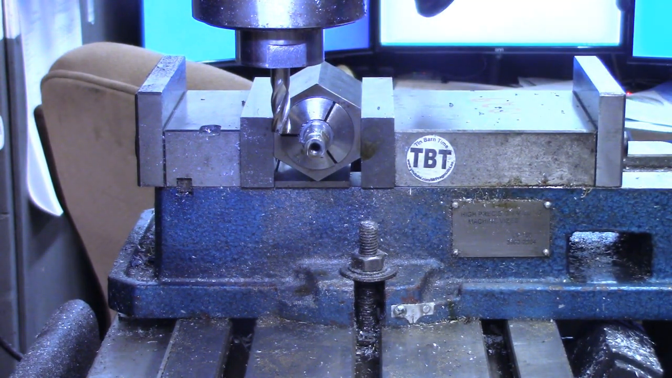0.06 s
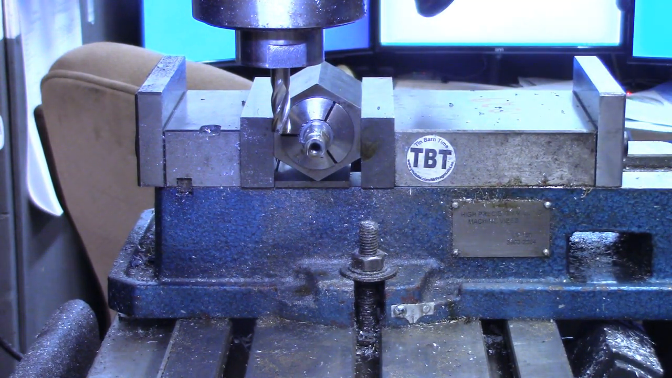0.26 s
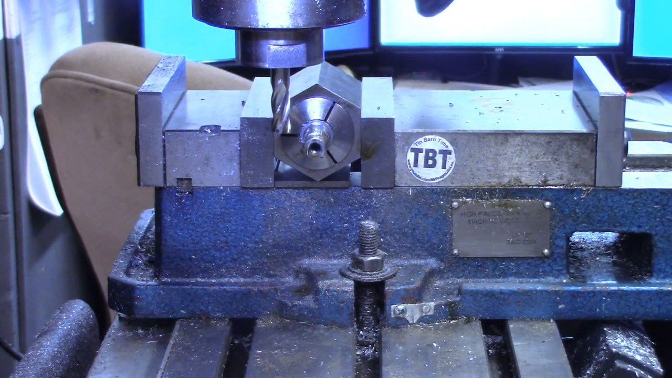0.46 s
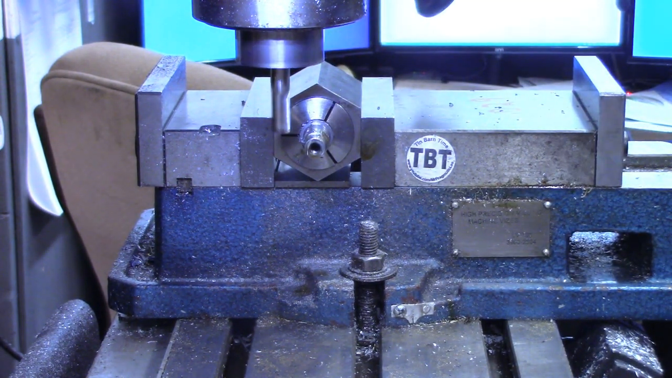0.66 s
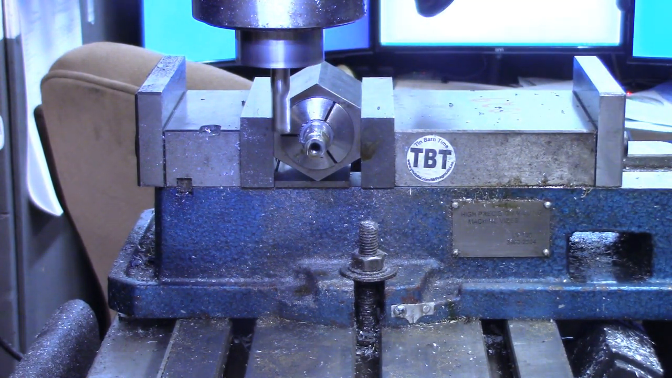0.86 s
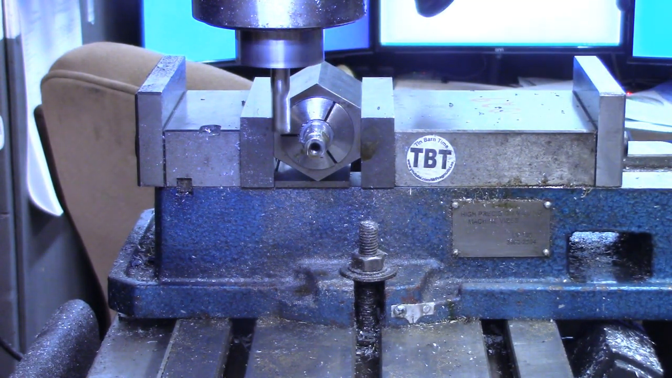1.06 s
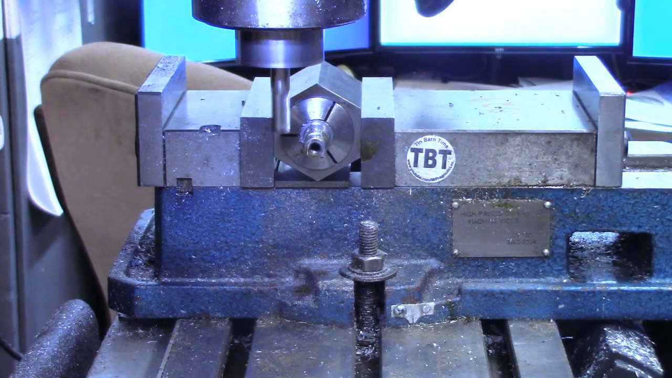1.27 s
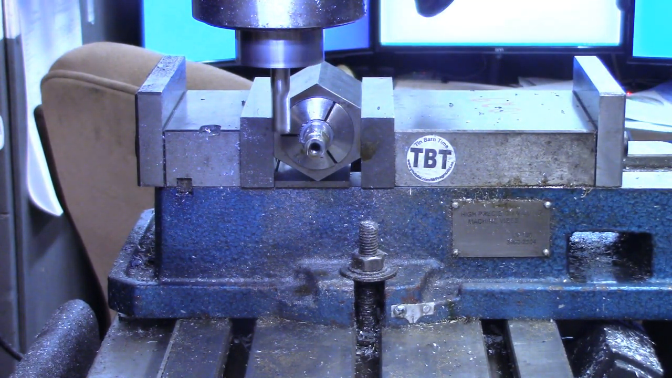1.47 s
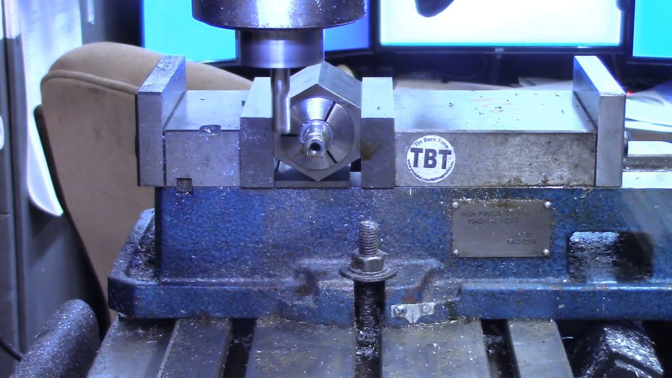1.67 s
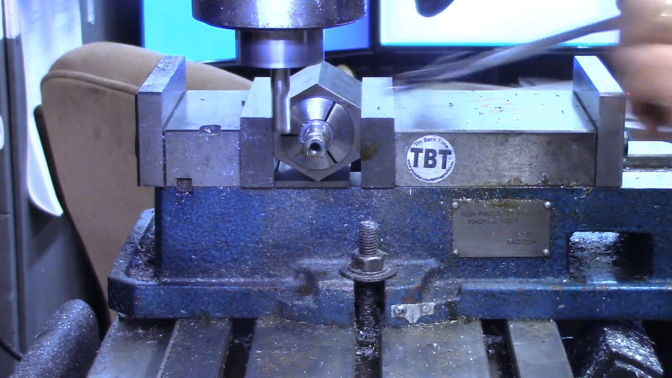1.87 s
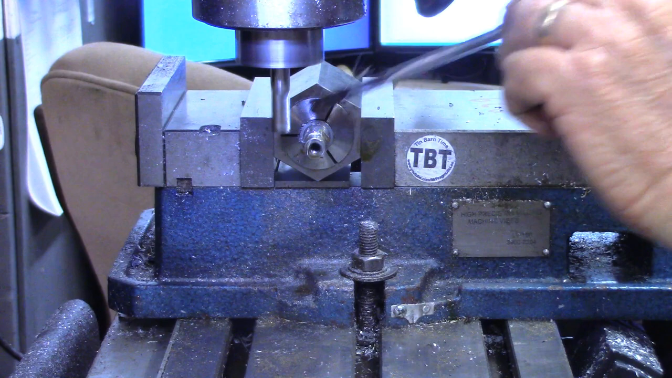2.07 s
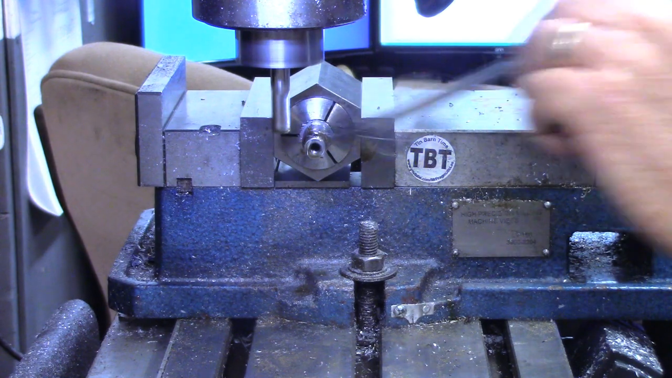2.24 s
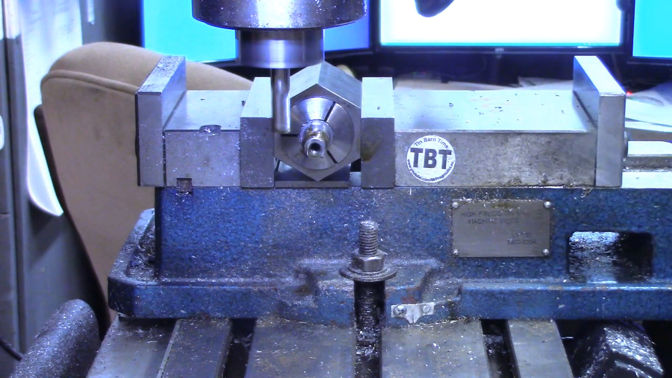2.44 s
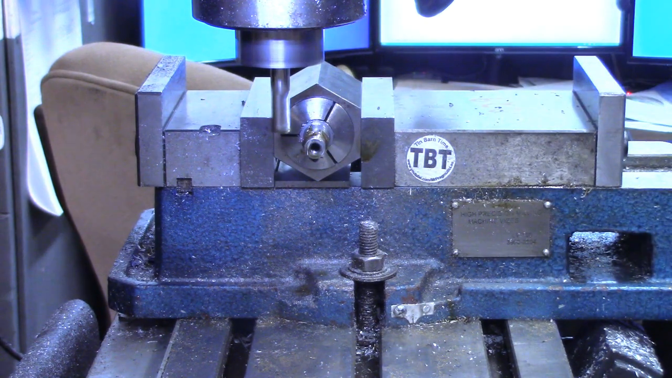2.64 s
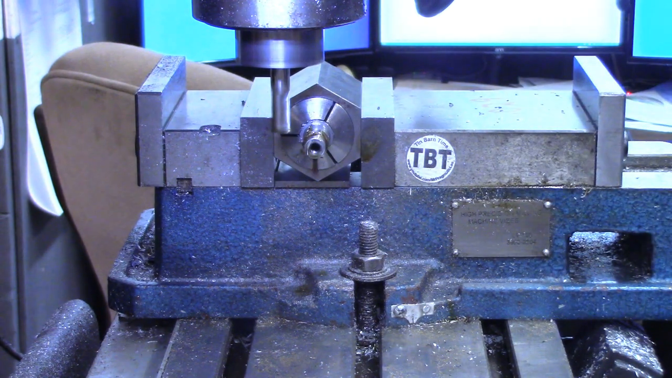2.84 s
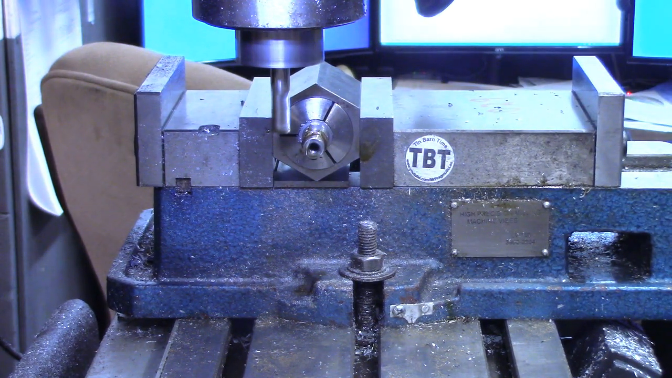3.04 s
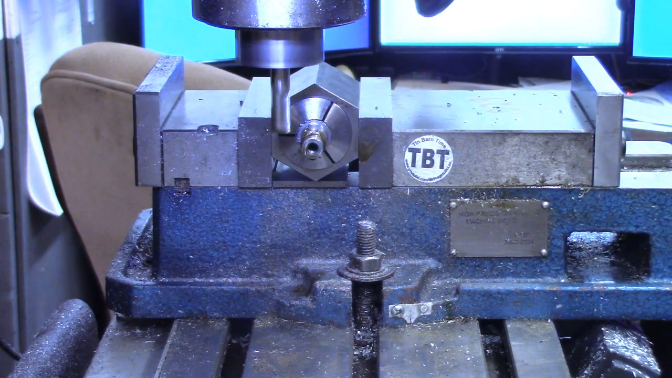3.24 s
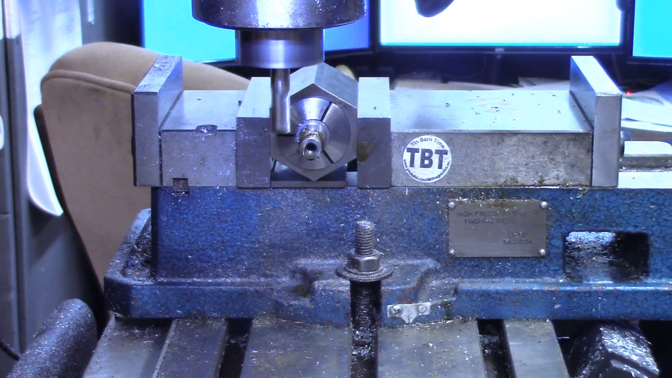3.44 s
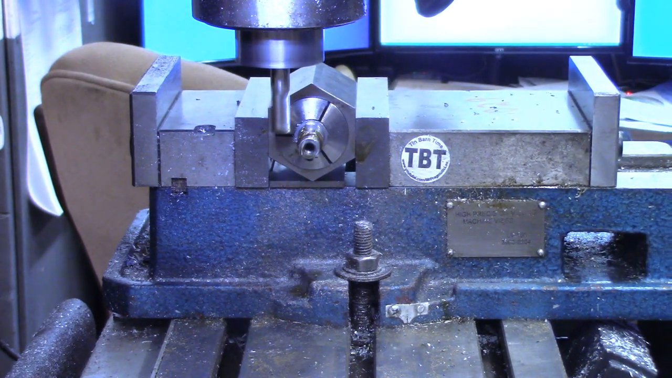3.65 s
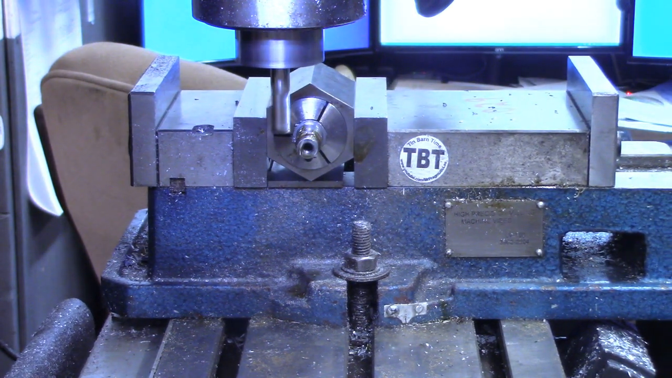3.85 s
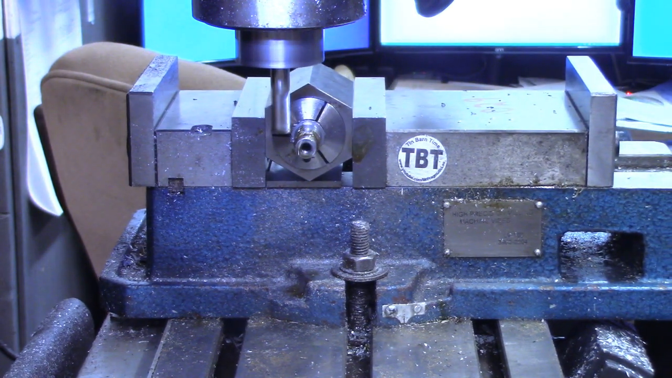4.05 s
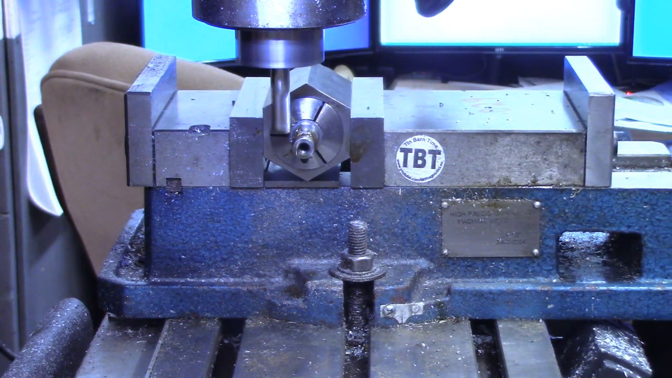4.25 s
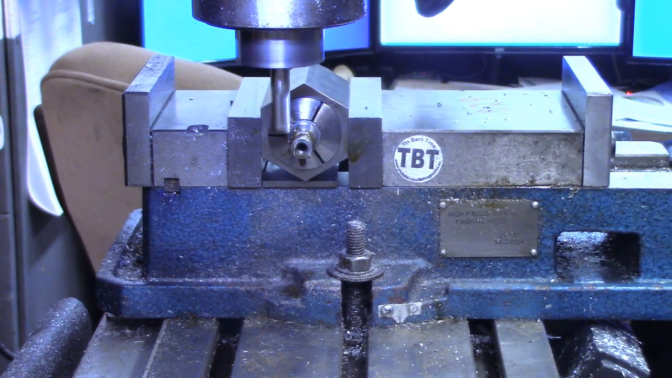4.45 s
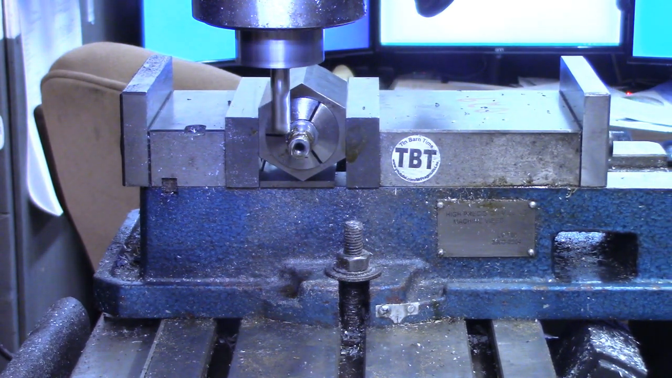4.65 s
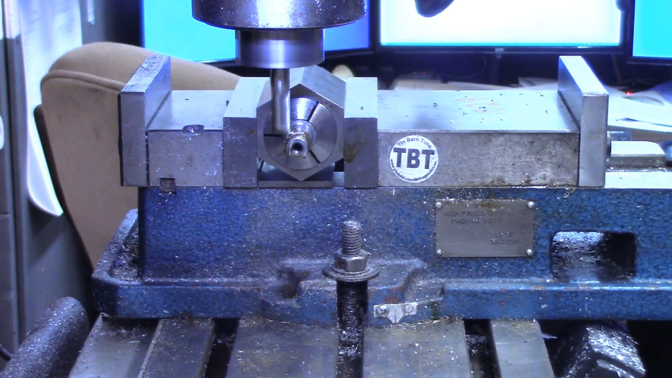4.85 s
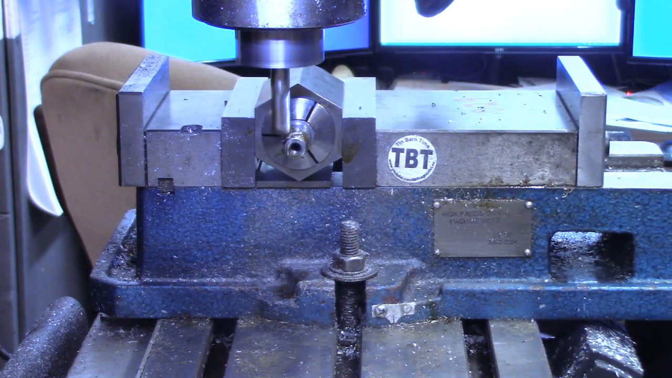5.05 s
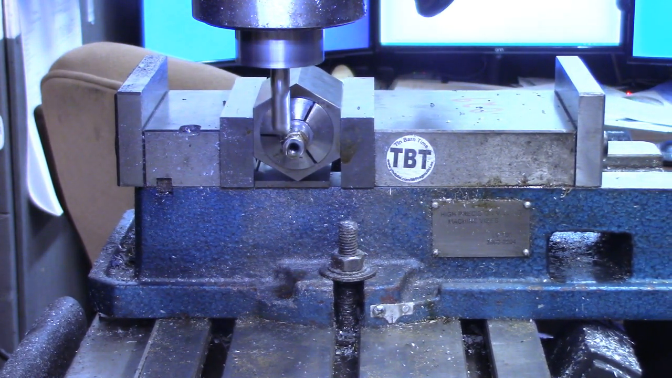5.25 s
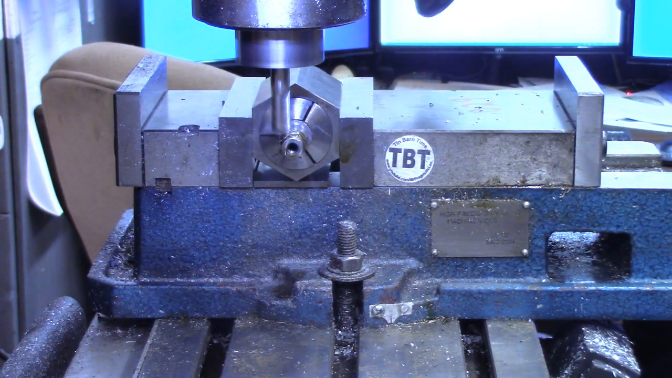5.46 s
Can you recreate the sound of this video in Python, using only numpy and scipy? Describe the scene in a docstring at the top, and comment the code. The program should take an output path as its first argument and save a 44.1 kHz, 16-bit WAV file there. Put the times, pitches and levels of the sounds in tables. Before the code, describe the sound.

Close up in a small workshop: near-silent room air with soft low rumbles, a faint switch tick, then a sharp gear clunk and short grind as a milling machine starts. It runs with a harsh, rapid metallic rattle, a hum and a wavering whine. Near the end the cutter touches steel, the rattle eases and a scraping, singing cut takes over.

```python
"""A geared milling machine starts up and then cuts steel in a small workshop, heard close up.
Soft low rumbles and a faint hiss (shaped noise) come first, then the tick of the switch (filtered clicks).
At switch-on the motor hums (wavering sines); the gears clunk into mesh and grind up to speed (random impacts).
They then rattle and whine, and the slack drive clatters on every spindle turn (impacts gated by the rotation).
Near the end the cutter meets the steel: the load quiets the gears, and the flutes scrape and sing."""
import sys
import numpy as np
from scipy import signal
from scipy.fft import rfft, irfft
from scipy.io import wavfile
from scipy.ndimage import uniform_filter1d

SR = 44100
rng = np.random.default_rng(int(sys.argv[2]) if len(sys.argv) > 2 else 0)


def transcribe(u):
    """Save the signal u as a 16-bit wav file named by the first command-line argument.

    u: samples, shape (n,) or (channels, n), limited to [-1, 1]; the rate is SR.
    q: integer samples, one column per channel.
    """
    v = np.clip(np.atleast_2d(u).T, -1, 1)
    q = np.round(v * 32767).astype(np.int16)
    wavfile.write(sys.argv[1], SR, q)


N = 242991
T = np.arange(N) / SR  # s
START, MESH_IN, UP_TO_SPEED = .626, .63, .745  # s: power on, gears engage, spindle at speed
CUT_START, FEED_IN_S = 5.1, .29  # s: the flutes first touch the steel; time from there to full load
SPINDLE_HZ, TURN_MARK = 19.825, .7495  # turns per second; s at which a turn begins
TURNS = (T - TURN_MARK) * SPINDLE_HZ
RIPPLE_HZ = 120  # motor torque ripple
FLURRY_HZ = 139.9  # flurries of tooth impacts, about seven a spindle turn


def gain_of(db):
    """Definition of the decibel: level to amplitude ratio."""
    return 10 ** (np.asarray(db) / 20)


def evened(x):
    """Normalisation of power: scales to an rms of one."""
    return x / np.sqrt(np.mean(x ** 2) + 1e-20)


def level(curve):
    """Envelope interpolated in decibels from rows (time [s], level [dB]); silent before the first row."""
    s, db = np.transpose(curve)
    return gain_of(np.interp(T, s, db)) * (T >= s[0])


def drift(hz):
    """Low-pass random fluctuation of rms one, falling away above about hz."""
    f = np.fft.rfftfreq(N, 1 / SR)
    spectrum = rfft(rng.standard_normal(N))
    return evened(irfft(spectrum / (1 + (f / hz) ** 4), N))


def lobe(turns, centre, width):
    """Periodic modulation: a smooth bump once a turn; centre and width in turns."""
    from_centre = (turns - centre + .5) % 1 - .5
    return np.exp(-.5 * (from_centre / width) ** 2)


def pulsing(hz, depth_db, width=0.18):
    """Amplitude modulation: a gain that peaks hz times a second, or dips if depth_db is negative."""
    return gain_of(depth_db * (2 * lobe(T * hz, 0.53, width) - 1))


def load():
    """Cutting load as a share of the full load: none until the flutes touch, then rising with the feed."""
    return np.clip((T - CUT_START) / FEED_IN_S, 0, 1)


def running(start, rise_s, db, loaded_db):
    """Onset and steady state: a gain that comes up at start, holds, and changes by loaded_db at full load."""
    return np.clip((T - start) / rise_s, 0, 1) * gain_of(db + loaded_db * load())


def swell(s, width_s, db):
    """Gaussian envelope: rises smoothly to db at s and falls again."""
    return gain_of(db) * np.exp(-.5 * ((T - s) / width_s) ** 2)


def burst(start, hold_s, db):
    """Exponential decay: a quick attack, a hold, then a release falling 60 dB in the decay time."""
    attack_s, t60_s = .011, .12
    release_db = -60 * np.maximum(T - start - hold_s, 0) / t60_s
    return np.clip((T - start) / attack_s, 0, 1) * gain_of(db + release_db)


def colour(x, shape, peaks=()):
    """Minimum-phase filtering by a broad spectrum and its resonances (or dips, where lift is negative)."""
    size = 8192
    hz = np.fft.rfftfreq(size, 1 / SR)
    f, db = np.transpose(shape)
    db = np.interp(np.log(hz + 1), np.log(f), db)
    for centre, width, lift in peaks:
        db = db + lift / (1 + (2 * (hz - centre) / width) ** 2)
    log_gain = np.log(gain_of(np.r_[db, db[-2:0:-1]]))
    # the Hilbert transform of the log gain is the phase that makes the ringing causal
    response = np.exp(np.conj(signal.hilbert(log_gain)))
    ring = np.fft.ifft(response).real[:size // 2]
    return signal.oaconvolve(x, ring)[:N]


def scatter(x, t60, wet_db):
    """Diffuse reverberation: the direct sound plus dense reflections decaying 60 dB in t60 seconds."""
    t = T[:SR // 2]
    tail = rng.standard_normal(len(t)) * gain_of(-60 * t / t60)
    return x + gain_of(wet_db) * signal.oaconvolve(x, tail / np.linalg.norm(tail))[:N]


def strikes(force, per_s, spread_db, t60, wet_db, count=8):
    """Random impact process: uneven blows share out the power of the force among count ringing spots."""
    size = gain_of(spread_db * np.clip(rng.standard_normal(N), -2, 2)) * rng.choice([-1, 1], N)
    hits = size * (rng.random(N) < per_s / SR)
    spot = rng.integers(0, count, N)
    # dividing by the local power lets the force alone set the strength
    local_power = abs(uniform_filter1d(hits ** 2, size=400))
    hits = force * hits / np.sqrt(local_power + 1e-4)
    return evened(sum(scatter(hits * (spot == k), t60, wet_db) for k in range(count)))


def tone(hz, waver_hz, flutter_db):
    """Frequency and amplitude modulation: a sine of rms one that wavers in pitch and strength."""
    phase = 2 * np.pi * np.cumsum(hz + waver_hz * drift(12.06)) / SR
    start_phase = 2 * np.pi * rng.random()
    return evened(np.sin(phase + start_phase) * gain_of(flutter_db * drift(37)))


def blows(rows, shape, t60, wet_db):
    """Impulse response: single knocks, each row's level being the rms over about ten milliseconds."""
    clicks = np.zeros(N)
    for s, db in rows:
        clicks[round(s * SR)] = gain_of(db)
    sound = colour(scatter(clicks, t60, wet_db), shape)
    return sound * np.linalg.norm(clicks) * np.sqrt(SR / 100) / np.linalg.norm(sound)


# spectrum of the room air: (frequency [Hz], relative level [dB])
AIR_COLOUR = [(30, -23.5), (100, -19), (180, -20), (780, -19.5), (1770, -27.5), (3000, -34.5),
              (5500, -40.5), (12400, -48), (14100, -50), (15500, -66)]
# soft low rumbles: (time of the top [s], width [s], level [dB])
RUMBLES = [(.245, 0.079, -47), (.37, 0.014, -55), (1.2, 0.048, -57.5)]


def workshop():
    """Broadband background noise: quiet room air, a brief faint hiss and soft low rumbles over a floor."""
    air = gain_of(-63.5) * evened(colour(rng.standard_normal(N), AIR_COLOUR))
    # noise spectra: (frequency [Hz], relative level [dB])
    hiss = colour(rng.standard_normal(N), [(200, 17.0), (2500, -5), (7000, -4.5), (13000, -12), (15500, -14)])
    low = colour(rng.standard_normal(N),
                 [(8, 3), (22, -5.5), (42, 3.5), (68, -4), (110, -33), (300, -84), (1000, -106)])
    rumble = gain_of(-71.5) + sum(swell(*row) for row in RUMBLES)
    return air + swell(0.029, width_s=0.026, db=-58.5) * evened(hiss) + rumble * evened(low)


# motor hum: (frequency [Hz], level relative to the other lines [dB])
HUM_LINES = [(120, -75.5), (150, -101), (180, -96), (199.7, -75.5), (230, -80.5), (299.6, -78), (320, -80)]


def motor_hum():
    """Line spectrum: low steady tones from the moment the power is on, stronger under load."""
    lines = sum(gain_of(db) * tone(hz, waver_hz=0.5, flutter_db=3.0) for hz, db in HUM_LINES)
    return running(START, rise_s=.06, db=1.0, loaded_db=4.0) * lines


# ticks of the switch: (time [s], level [dB])
TICKS = [(.469, -66), (.473, -56), (.489, -70)]
# spectrum of the switch: (frequency [Hz], relative level [dB])
SWITCH_COLOUR = [(200, -28), (900, -14), (1400, 6), (2000, 3), (2800, -13), (5000, -23), (12000, -38)]
# the gears taking up their slack: (time [s], level [dB])
CLUNKS = [(.6642, -29), (.6712, -60), (.755, -40.5), (.7765, -41)]
# spectrum of the clunks: (frequency [Hz], relative level [dB])
CLUNK_COLOUR = [(40, -48), (150, -22), (450, 5), (1300, 7.5), (2200, -9), (3700, 13.5), (4050, 2),
                (4400, 11), (5150, -5), (5700, 8.5), (6400, -22), (8000, 0), (12500, -28), (15500, -53)]
# grinding bursts while the drive runs up to speed: (start [s], hold [s], level [dB])
GRINDS = [(0.624, 0.017, -38), (0.665, .052, -34)]
# spectrum of the grinding: (frequency [Hz], relative level [dB])
GRIND_COLOUR = [(100, -31), (250, -17), (400, -1), (560, -3.5), (900, -8), (1300, -2), (2500, -9.5),
                (4400, -16.5), (6500, -21), (10500, -26), (12800, -36), (15000, -53)]


def start_up():
    """Transient excitation: the switch ticks, the gears clunk into mesh and grind up to speed."""
    ticks = blows(TICKS, SWITCH_COLOUR, t60=0.022, wet_db=1)
    clunks = blows(CLUNKS, CLUNK_COLOUR, t60=0.048, wet_db=13)
    ripple = pulsing(RIPPLE_HZ, depth_db=2)
    teeth = strikes(ripple, per_s=1600, spread_db=5.5, t60=0.039, wet_db=-0.5)
    grind = sum(burst(*row) for row in GRINDS) * evened(colour(teeth, GRIND_COLOUR))
    return ticks + clunks + grind


# strongest meshing tone, before a common trim: (time [s], level [dB])
MESH_LEVEL = [(0.72, -51), (0.88, -45.5), (1.13, -46.5), (1.4, -49.5), (1.62, -46.5), (2.0, -48),
              (2.15, -51.5), (2.68, -46.5), (2.95, -49), (3.38, -45.0), (3.8, -48), (4.0, -59.5),
              (4.36, -42), (4.75, -48.5), (4.9, -60), (5.1, -41.5), (5.25, -62), (5.51, -57.5)]
# steady tones of the gear train: (frequency [Hz], level relative to the other lines [dB])
GEAR_LINES = [(399.8, -60), (419, -63.5), (439, -67), (460.1, -62.5), (479, -64), (538, -61.5),
              (566, -60.5), (581.5, -60), (603, -67), (719.5, -58), (938.8, -60), (1033, -67),
              (1116.5, -54.5), (1268, -57), (1463, -53), (1494, -61.5), (1537, -61), (1668.5, -61),
              (2023, -54.5), (2223, -62), (2497, -59.5), (2676, -58.5), (3219, -55.5)]


def gear_whine():
    """Modulated meshing tones; the strongest swells once a turn, as its gear runs slightly off centre."""
    off_centre = gain_of(3.8 * np.cos(2 * np.pi * (TURNS + 0.2)))
    strongest = evened(tone(702, waver_hz=2.59, flutter_db=2.0) * off_centre)
    mesh = gain_of(-2.3) * level(MESH_LEVEL) * strongest
    lines = sum(gain_of(db) * tone(hz, waver_hz=0.00247 * hz, flutter_db=4.0) for hz, db in GEAR_LINES)
    return mesh + running(MESH_IN, rise_s=0.13, db=1.0, loaded_db=-2.5) * lines


# spectrum of the scrape: (frequency [Hz], relative level [dB])
SCRAPE_COLOUR = [(100, -13), (250, -3.5), (420, 10.5), (750, -3), (2400, 4.5), (4000, -6), (6200, -9),
                 (7500, -8), (8600, -13), (10700, -16), (11200, -21), (15000, -33)]
# resonances of the cutter: (frequency [Hz], width [Hz], lift [dB])
CUTTER_MODES = [(1450, 150, 3.6), (5260, 690, 13.7), (10600, 700, 3), (12550, 500, 5)]


def cutting():
    """Forced vibration: four flutes shave the steel in turn, ringing the cutter, with a low push each pass."""
    flutes = 4 * TURNS
    uneven = gain_of(1.8 * drift(53))  # the chips tear off unevenly
    force = (.6 + lobe(flutes, 0.091, width=0.12)) * uneven
    chips = strikes(force, per_s=2400, spread_db=1.5, t60=0.028, wet_db=-3.0)
    contact = np.clip((T - CUT_START) / .04, 0, 1)
    # the push has the flute rate and its third harmonic
    push = gain_of(-65) * np.sin(2 * np.pi * flutes) + gain_of(-70) * np.sin(2 * np.pi * 3 * flutes)
    bite = gain_of(-43.0) * load() ** 0.44  # the scrape grows with the depth of the cut
    return bite * evened(colour(chips, SCRAPE_COLOUR, CUTTER_MODES)) + contact * push


# how hard the loose drive shakes; clatter, gears and cover all follow it: (time [s], gain [dB])
SHAKE = [(.626, 0), (1.15, -0.9), (1.5, .3), (3.4, 0.54), (4.0, -0.9), (4.7, -0.7), (5.07, .8)]
# spectrum of the clatter: (frequency [Hz], relative level [dB])
DRIVE_COLOUR = [(150, -47), (600, -2.5), (1100, 4.5), (2000, -2), (2300, 9.5), (3200, 4), (3480, -8),
                (3900, -0.5), (4700, -11), (5400, -5), (6100, -13.5), (7500, -14), (10000, -39),
                (15000, -38)]
# resonances of the spindle: (frequency [Hz], width [Hz], lift [dB])
SPINDLE_MODES = [(2280, 200, 5.7), (2700, 52, 0.62), (3010, 280, 4.1), (3640, 100, 7.9), (4940, 120, 4.8),
                 (6880, 100, 9.2), (7300, 400, 5.7), (12550, 500, 7)]


def drive_clatter():
    """Periodic impact: once a turn the slack drive slaps over, a light touch and then a hard burst."""
    turns = TURNS + 0.014 * drift(6.3)  # the slap comes a little early or late
    force = lobe(turns, 0.0052, width=0.054) + 0.5 * lobe(turns, -0.18, width=0.057)
    ripple = pulsing(RIPPLE_HZ, depth_db=-2)  # motor torque ripple shakes the drive
    hits = strikes(force * ripple, per_s=3200, spread_db=2.0, t60=0.021, wet_db=-10.5)
    strength = level(SHAKE) * running(UP_TO_SPEED, rise_s=0.036, db=-42.0, loaded_db=-8.5)
    return strength * evened(colour(hits, DRIVE_COLOUR, SPINDLE_MODES))


# spectra of the gearbox, the tooth tips and the cover: (frequency [Hz], relative level [dB])
GEARBOX_COLOUR = [(60, -30.5), (150, -24.5), (260, -16.5), (380, -6.5), (820, -6), (1020, -1), (1180, 1.5),
                  (2100, 0), (2800, -5.5), (4000, -8), (5000, -19), (7500, -20.5), (10000, -29),
                  (15500, -52.5)]
TOOTH_TIP_COLOUR = [(200, -36), (1200, -12), (2500, 6), (3900, 7.5), (5200, 0.5), (6200, -8), (7300, -6.5),
                    (10000, -17), (12500, -31), (15000, -41)]
COVER_COLOUR = [(300, -75), (1200, -21), (1400, 7.5), (1480, 6.5), (1580, -22.5), (4000, -46), (15000, -70)]
# resonances and dips of the casting: (frequency [Hz], width [Hz], lift [dB])
CASTING_MODES = [(410, 83, 1.5), (511, 22, -15.5), (589.6, 22, 7.5), (667, 71, -3), (720.5, 33, 7),
                 (2110, 25, -13.5), (2280, 410, 4.5), (3510, 190, -3.5), (3800, 100, 5), (5390, 340, 6.5),
                 (6560, 600, -0.5), (12550, 600, 9.5)]


def gear_rattle():
    """Backlash impacts: unloaded teeth bounce in flurries, ring the casting and shake a sheet-metal cover."""
    sway = 0.49 + 0.27 * lobe(TURNS, 0.11, width=0.048) + 0.31 * lobe(TURNS, -0.38, width=0.033)
    flurries = pulsing(FLURRY_HZ, depth_db=2.5, width=.1) * pulsing(RIPPLE_HZ, depth_db=1.85)
    force = sway * flurries
    blows_on_body = strikes(force, per_s=3600, spread_db=6, t60=0.041, wet_db=0.0)
    body = colour(blows_on_body, GEARBOX_COLOUR, CASTING_MODES)

    # the hardest blows land on the tooth tips and click brightly
    tip_force = force * flurries * gain_of(2.1 * drift(64))
    tips = strikes(tip_force, per_s=420, spread_db=2, t60=0.019, wet_db=11)
    teeth = 0.93 * evened(body) + gain_of(-10.5) * evened(colour(tips, TOOTH_TIP_COLOUR))

    # the cover is shaken three times a turn
    shakes = 0.8 + lobe(TURNS, -0.28, width=0.06) + lobe(TURNS, -0.0076, width=0.046)
    shakes = shakes + lobe(TURNS, 0.32, width=0.091)
    cover = colour(strikes(shakes, per_s=1500, spread_db=3.0, t60=0.076, wet_db=-7.5), COVER_COLOUR)
    cover = evened(cover) * gain_of(2 * drift(5.0))  # its ringing comes and goes

    teeth_gain = running(START, rise_s=0.065, db=-38.0, loaded_db=-5)
    cover_gain = running(START, rise_s=0.045, db=-48.5, loaded_db=-4.5)
    return level(SHAKE) * (teeth_gain * teeth + cover_gain * cover)


def scene():
    """Superposition: the impacts with short reflections from the workshop walls, plus tones and background."""
    machine = start_up() + cutting() + drive_clatter() + gear_rattle()
    in_room = scatter(machine, t60=.3, wet_db=-17)
    return (workshop() + motor_hum() + gear_whine() + in_room)[None]


def record(dry):
    """Band limitation: a linear-phase low-pass filter at the recorder's upper edge."""
    low_pass = signal.firwin(511, 15450, window=("kaiser", 9), fs=SR)  # edge in Hz
    return signal.oaconvolve(dry, low_pass[None], "same")


dry = scene()
out = record(dry)
transcribe(out)
```